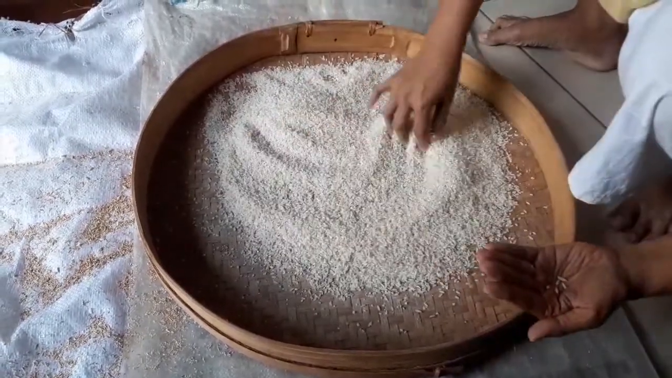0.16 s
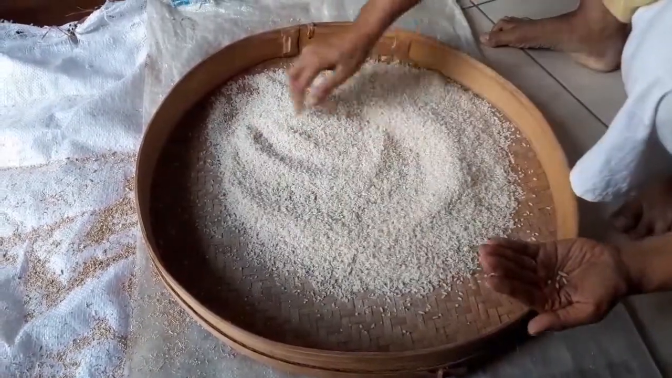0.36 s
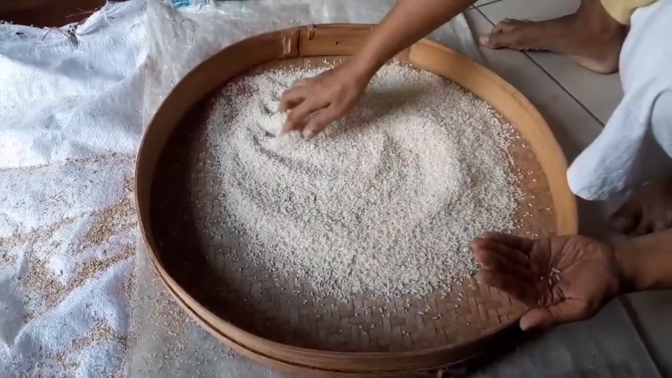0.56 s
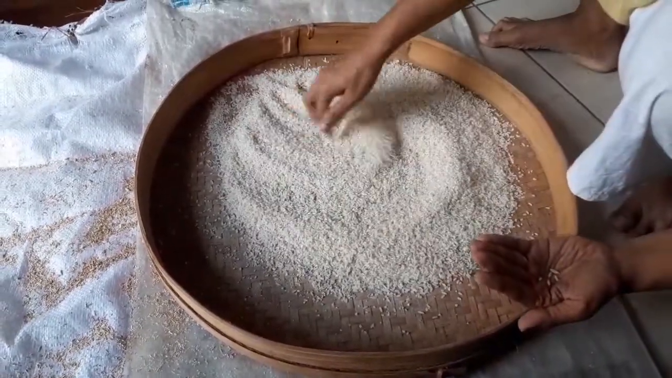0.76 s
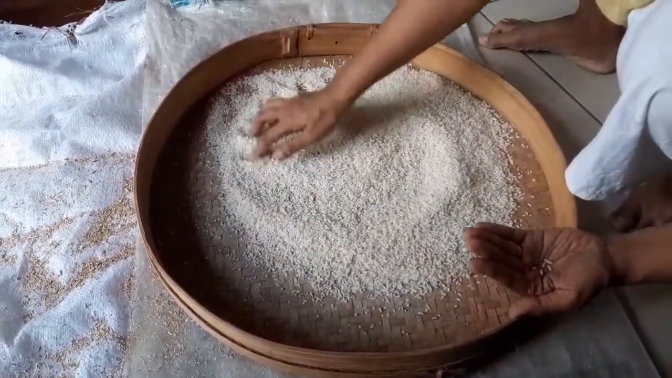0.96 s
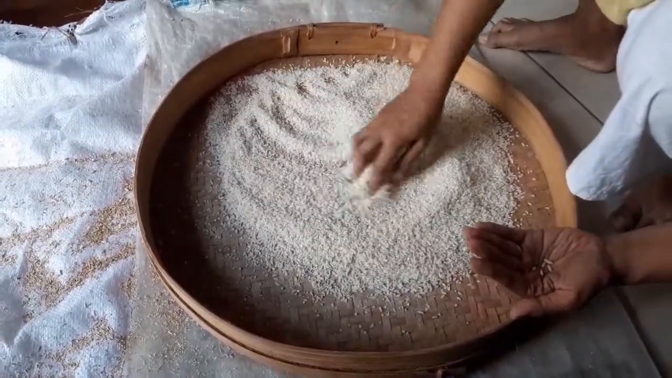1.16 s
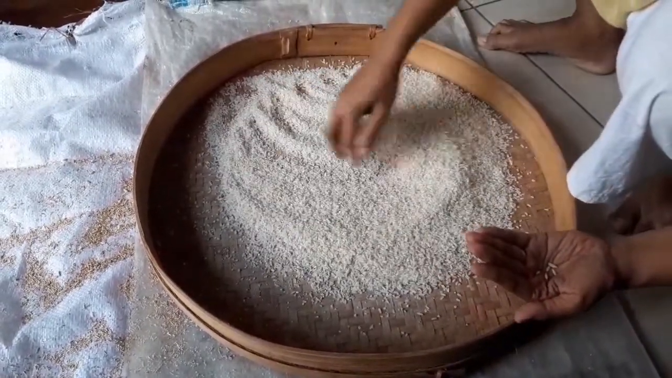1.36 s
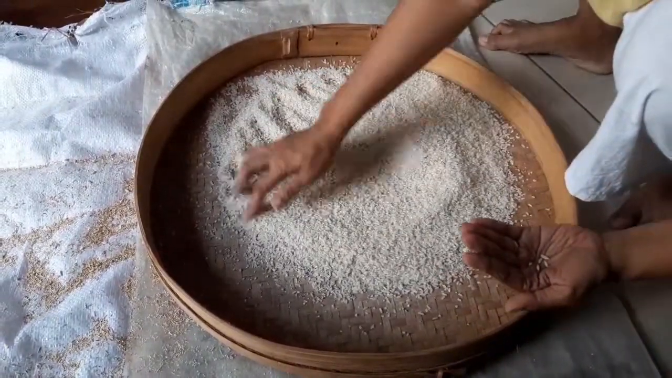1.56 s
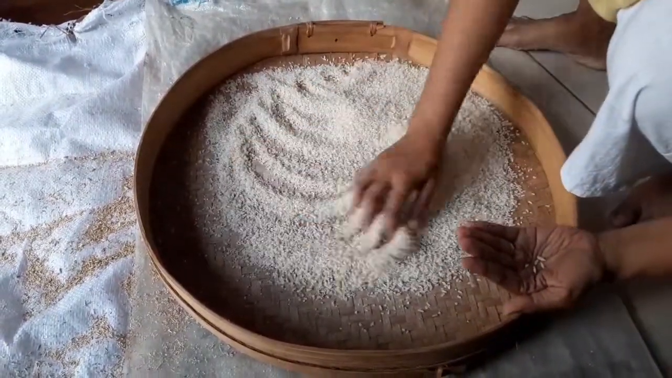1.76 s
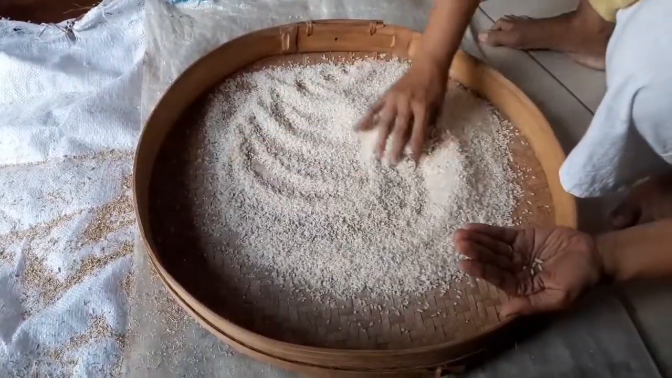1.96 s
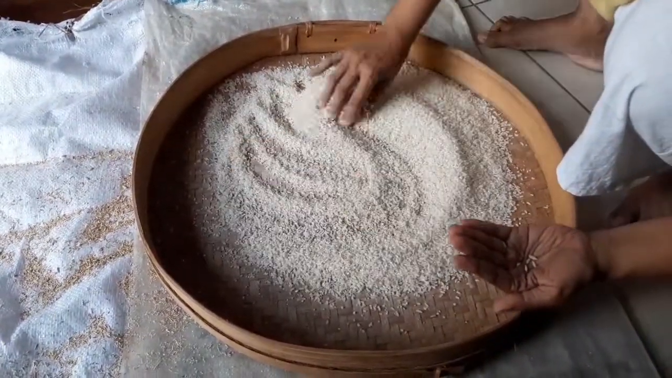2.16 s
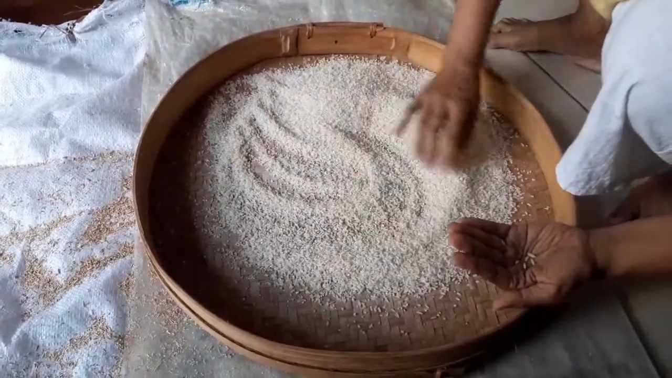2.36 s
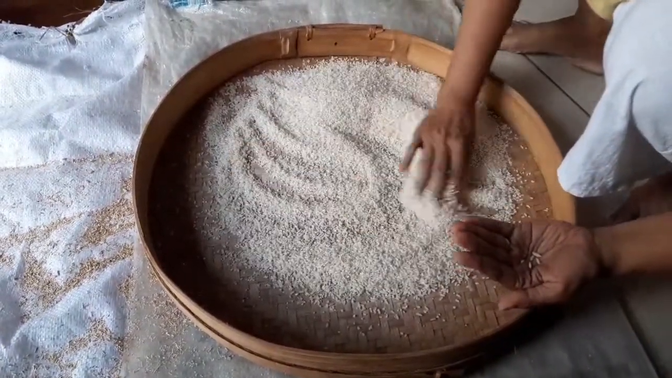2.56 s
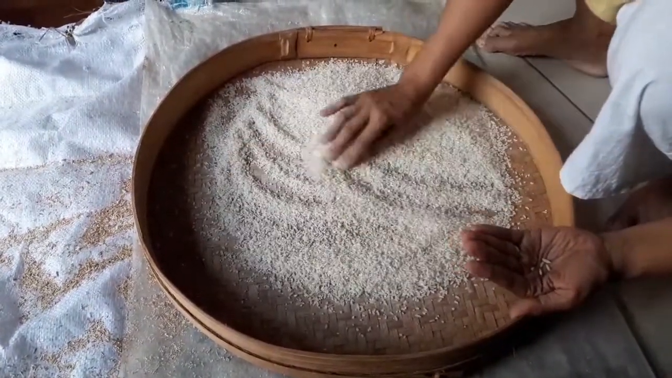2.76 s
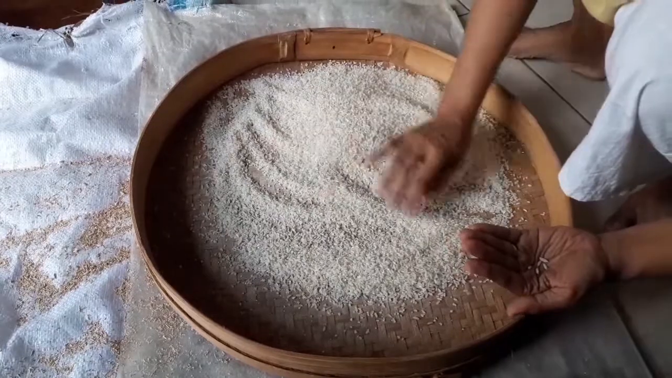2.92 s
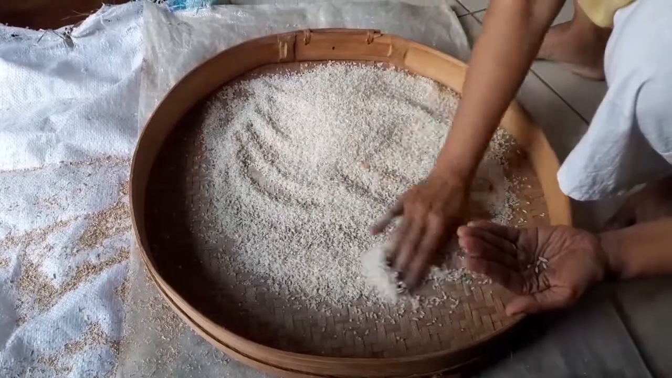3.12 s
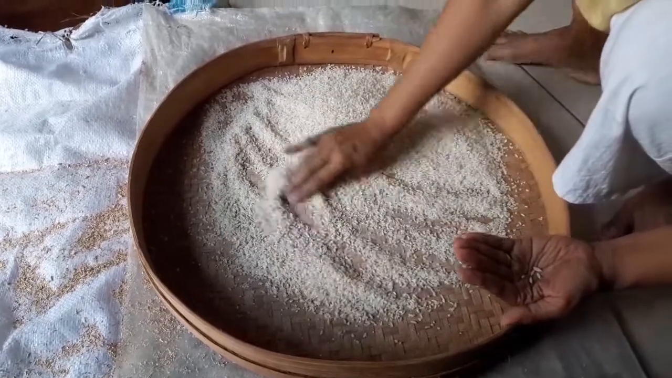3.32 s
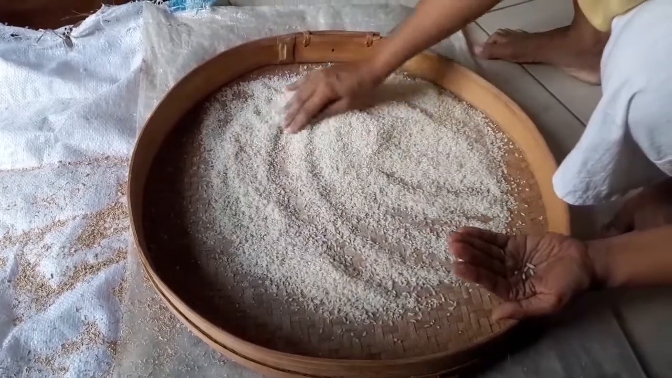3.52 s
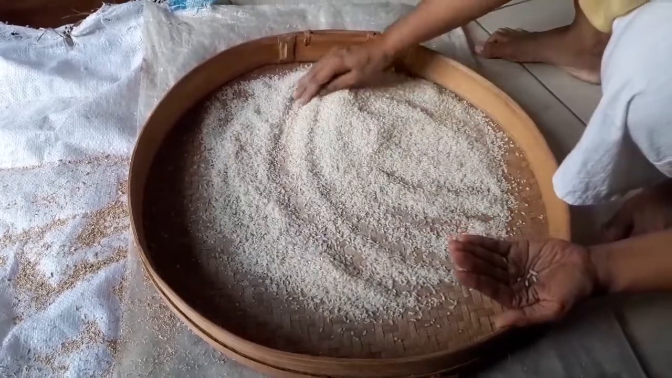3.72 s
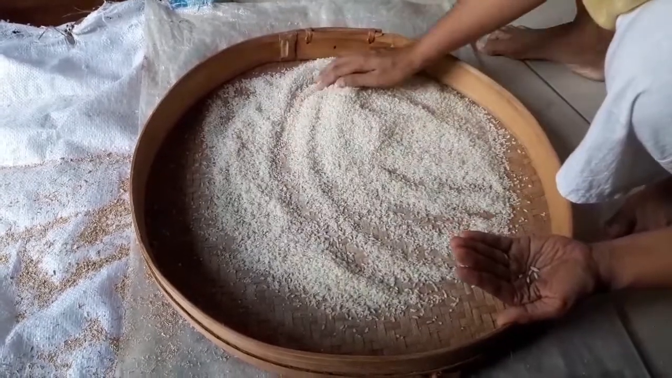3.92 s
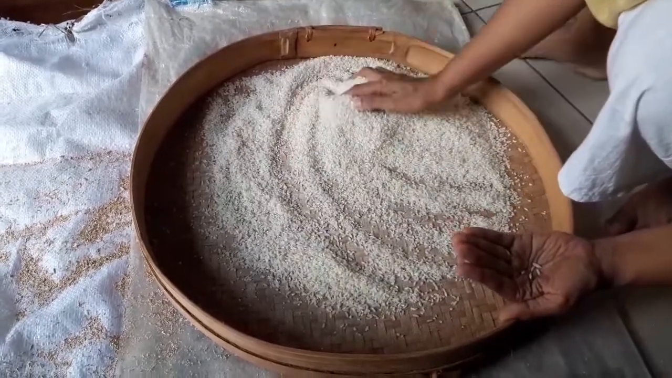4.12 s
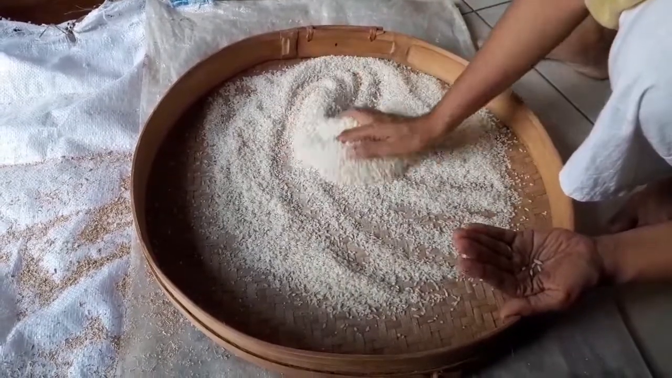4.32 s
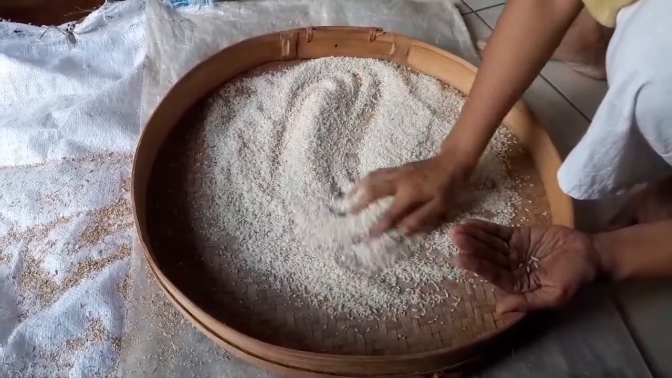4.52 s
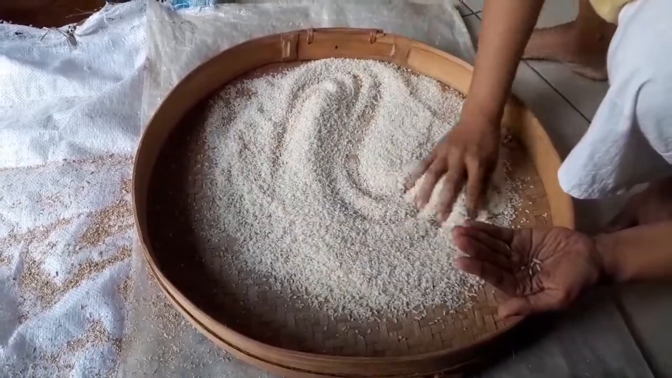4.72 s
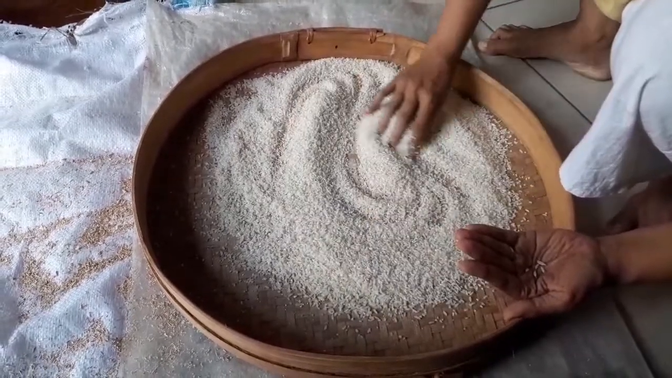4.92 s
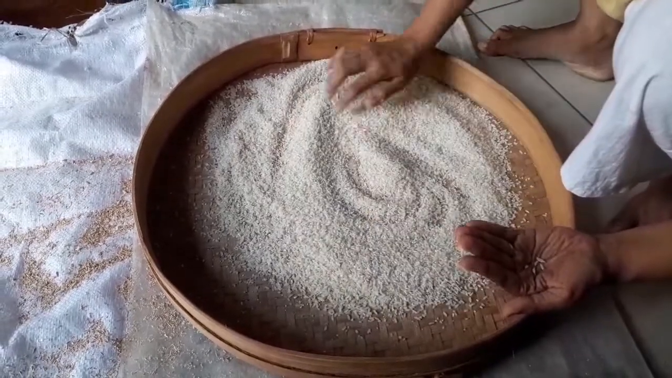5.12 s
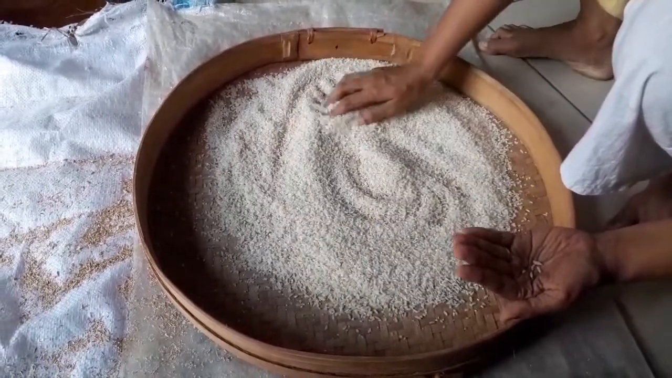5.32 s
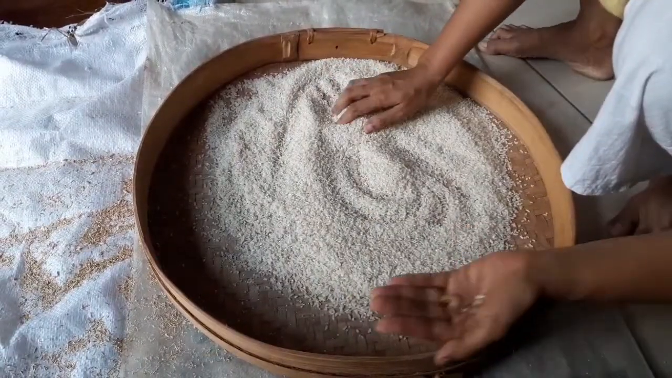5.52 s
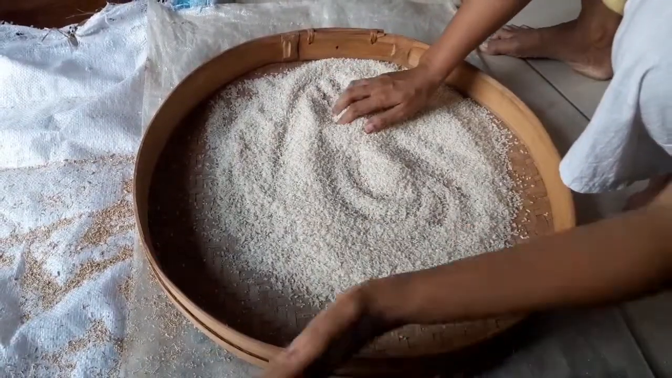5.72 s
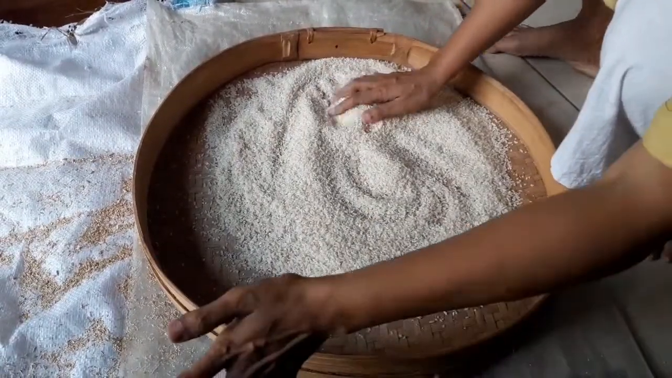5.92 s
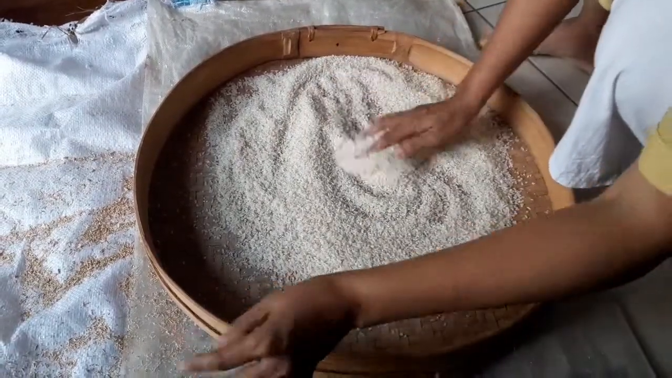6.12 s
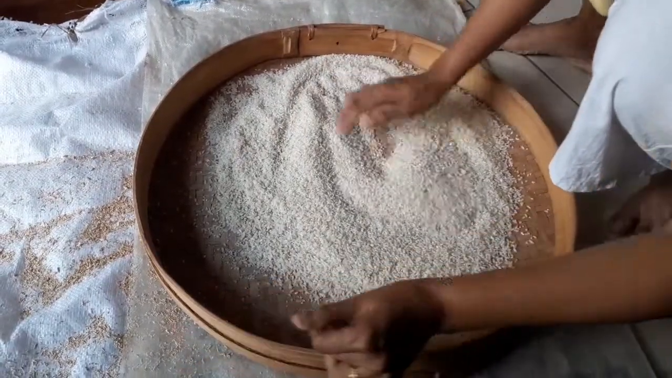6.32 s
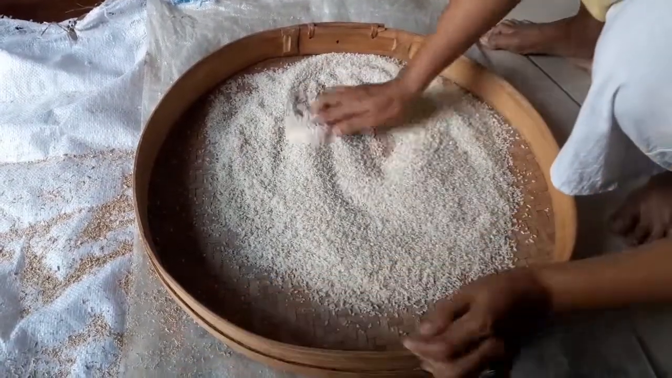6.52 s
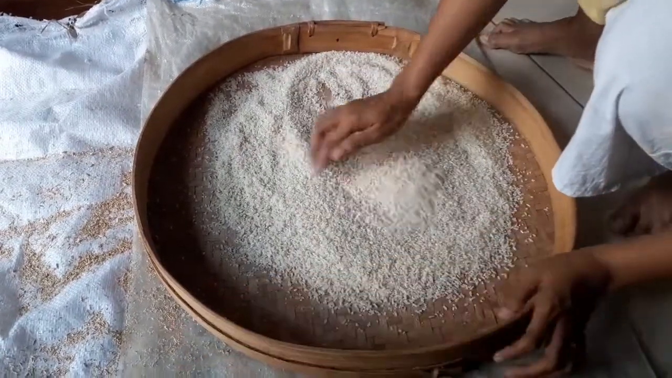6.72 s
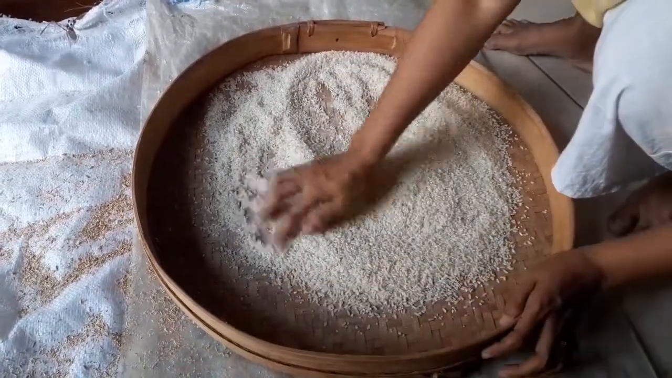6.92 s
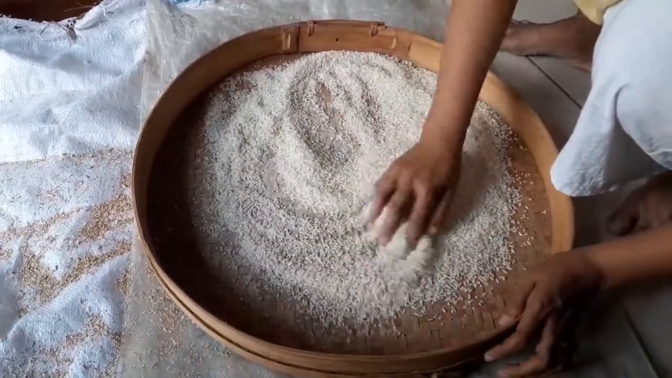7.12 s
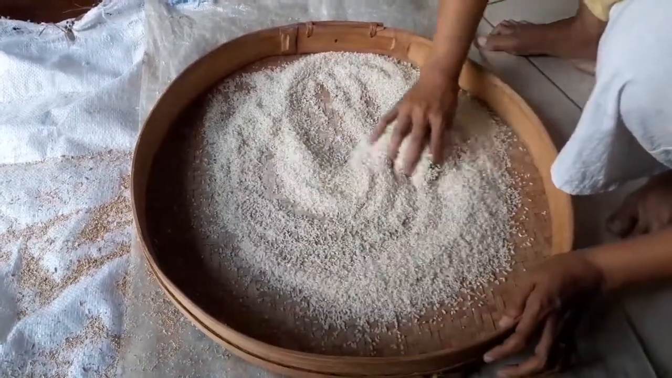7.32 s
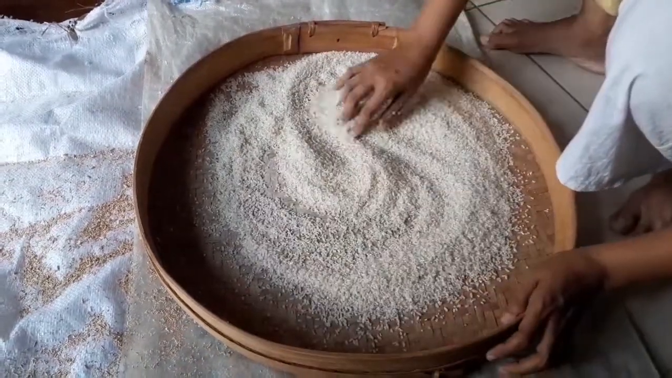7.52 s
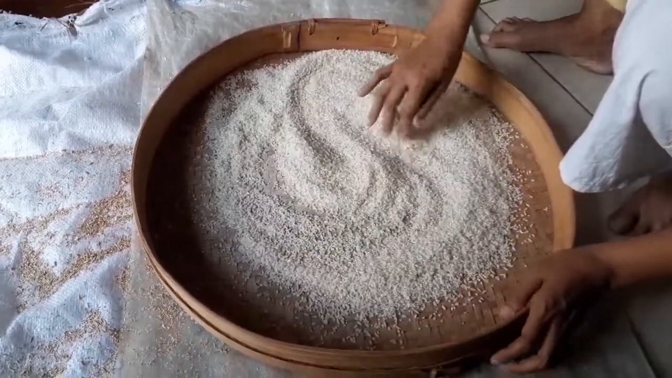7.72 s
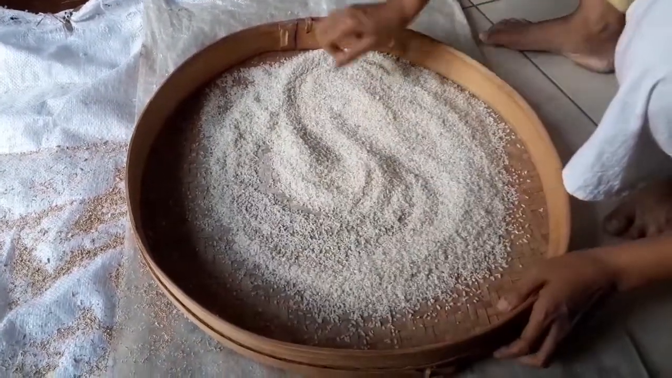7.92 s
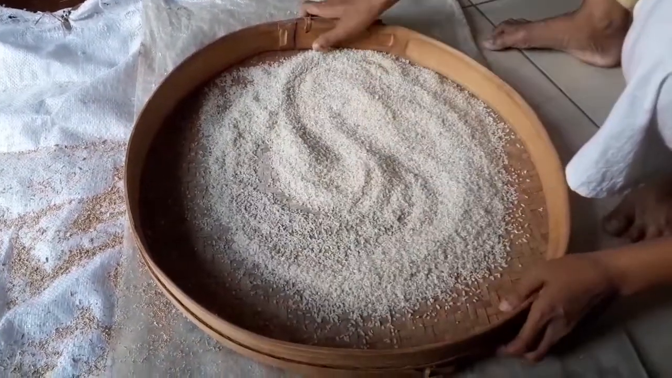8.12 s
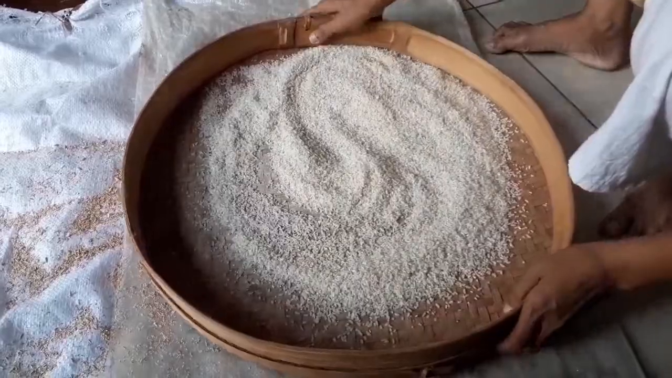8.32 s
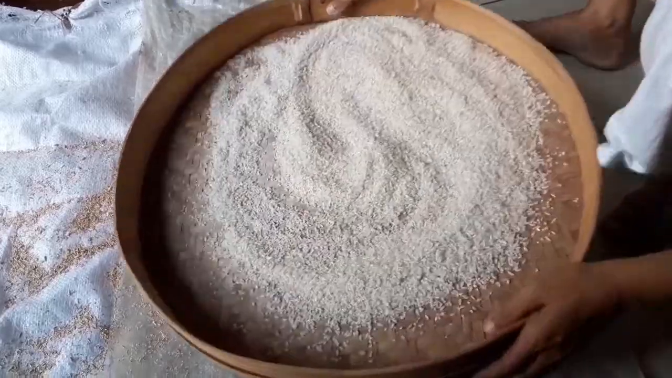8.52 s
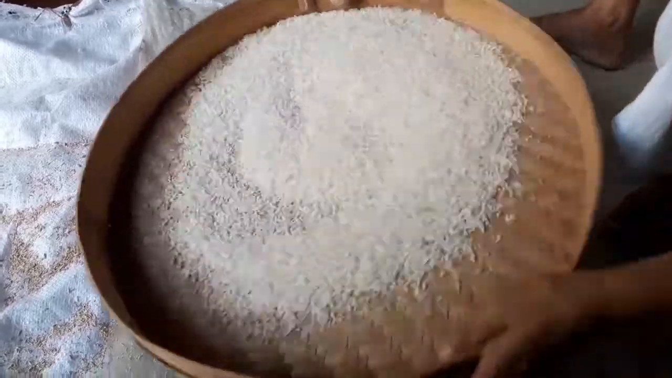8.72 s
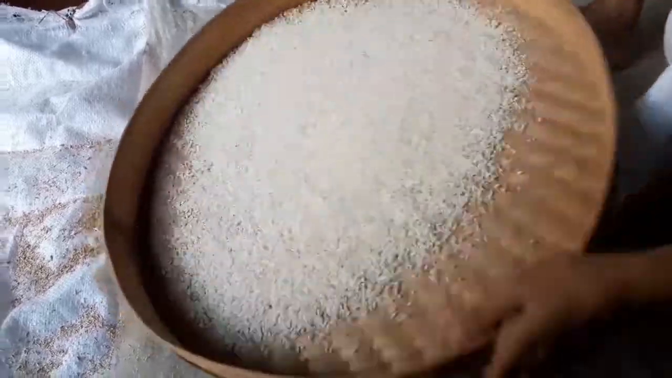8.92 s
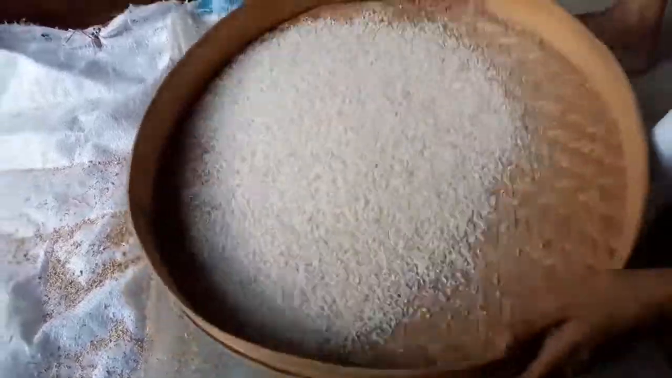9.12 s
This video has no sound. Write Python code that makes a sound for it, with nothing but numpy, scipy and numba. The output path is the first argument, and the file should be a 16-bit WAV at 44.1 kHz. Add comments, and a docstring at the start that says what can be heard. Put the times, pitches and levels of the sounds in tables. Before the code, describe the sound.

In a quiet tiled room, dry rice rustles close to the microphone as fingers sweep it across a woven tray, roughly twice a second. The strokes swell and fade unevenly, with soft taps and settling grains in the gaps. After a short lull, light knocks come as the tray is picked up, followed by four fast, louder shakes of the rice. A low motor hums faintly underneath.

```python
"""A fridge-like motor hums in a quiet tiled room. From the start a hand sweeps raw rice around a woven
tray on the floor: at each push thousands of grain collisions tick, the heap hisses lower and the weave
drums under the load. Between pushes fingertips tap and furrows cave in. At 8.3 s the tray is lifted,
which frees its low modes, and then shaken four times. A phone with two microphones is close by."""
import sys
import numpy as np
from scipy import signal
from scipy.io import wavfile
from scipy.ndimage import map_coordinates
from numba import njit

SR = 44100
rng = np.random.default_rng(int(sys.argv[2]) if len(sys.argv) > 2 else 0)


def write(x):
    x = np.atleast_2d(x).T
    wavfile.write(sys.argv[1], SR, np.round(np.clip(x, -1, 1) * 32767).astype(np.int16))

N = 408807


def undb(db):
    """Amplitude ratio of a level in decibels."""
    return 10 ** (np.asarray(db) / 20)

def at_level(x, db):
    """Normalisation to an rms level."""
    return x * undb(db) / np.sqrt(np.mean(x ** 2))

def waver(rate):
    """Slow random modulation: a spline on values 1 / rate s apart, with a spread near 1."""
    knots = rng.standard_normal(int(N / SR * rate) + 3)
    return map_coordinates(knots, [np.arange(0, N + 64, 64) * rate / SR], order=2).repeat(64)[:N]

def resonate(x, hz, *widths_hz):
    """Resonance: one second-order stage per bandwidth, in series, with unit gain at the centre."""
    for width in widths_hz:
        x = signal.lfilter(*signal.iirpeak(min(hz, .45 * SR), hz / width, fs=SR), x)
    return x

@njit
def glide(x, hz, q):
    """Time-varying resonance: a state-variable band-pass with unit gain at its moving centre."""
    y, band, low, damping = np.empty(len(x)), 0., 0., 1 / q
    for i in range(len(x)):
        g = np.tan(np.pi * hz[i] / SR)
        v = (band + g * (x[i] - low)) / (1 + g * (g + damping))
        band, low, y[i] = 2 * v - band, low + 2 * g * v, damping * v
    return y

def level_at(spectrum, hz):
    """Interpolation of a spectrum on a logarithmic frequency axis."""
    f, db = np.transpose(spectrum)
    return np.interp(np.log(hz), np.log(f), db)

def collisions(rate, scatter_db, lag_samples):
    """Shot noise: impacts of random size, each reaching the two microphones with its own lag."""
    chance, size, place = rng.random((3, N), dtype=np.float32)
    at = np.flatnonzero(chance < rate / SR)
    strength = undb(-scatter_db * np.log(1 - size[at]))
    blow = np.where(at % 2, 1, -1) * strength / np.sqrt(rate[at])  # equal power at any rate
    lag = np.rint(lag_samples * (place[at] - place[at - 1]) / 2).astype(int)  # most land mid-tray
    return np.array([np.bincount(np.clip(at + side * lag, 0, N - 1), blow, N) for side in (1, -1)])


COHERENT_HZ = 850  # well below this both microphones hear nearly the same
# Spectrum of the room tone: f/Hz, relative spectral level/dB
AIR_SPECTRUM = [(45, 0.5), (65, -5), (120, -7.5), (200, -9.5), (310, -6), (410, -20), (520, -7),
                (620, -15.5), (800, -12.5), (950, -48), (1500, -22), (3000, -26), (8000, -34), (15000, -36)]
def room_tone():
    """Diffuse noise in flickering third-octave bands, coherent between microphones only in the bass."""
    out, bass_swell_db = 0, 1.5 * waver(2.94)
    for hz in 50 * 2 ** np.arange(0, 8.4, 1 / 3):
        mid, side = resonate(rng.standard_normal((2, N), dtype=np.float32), hz, hz / 3, hz / 2)
        apart = np.clip(hz / COHERENT_HZ, 0, 1) ** 0.53
        db = level_at(AIR_SPECTRUM, hz) + 1.1 * waver(2.8) + (hz < 260) * bass_swell_db
        out = out + undb(db) * (mid + apart * side * np.array([[1], [-1]])) / np.sqrt(1 + apart ** 2)
    return at_level(out, -60) * undb([[-3], [3]])  # sits to the right


# Motor partials: multiple of the shaft rate, relative level/dB
HARMONICS = [(1, -0.5), (2, -6.5), (3, -11), (4, -14), (5, -15.5), (6, -17), (7, -13), (10, -9.5),
             (11, -4.5), (12, -18), (14, -8), (17, -15)]
# Swelling and sinking of the hum: t/s, level/dB
HUM_ENVELOPE = [(0.0, -61.5), (1.88, -61.5), (2.5, -59.5), (4.98, -61), (5.29, -63.5), (7.59, -59),
                (7.98, -66), (8.62, -58), (9.27, -62.5)]
# Coming and going of a second low tone: t/s, level/dB
NEIGHBOUR_ENVELOPE = [(0, -56), (1, -97), (2, -68), (2.5, -89.5), (4.9, -65.5), (5.3, -104), (9.27, -74)]
def motor(shaft_hz=48.4, neighbour_hz=52.3):
    """Rotation gives a harmonic series; a neighbouring tone beats against its fundamental."""
    t = np.arange(N) / SR
    angle = 2 * np.pi * np.cumsum(shaft_hz * (1 + 0.00091 * waver(0.71))) / SR
    hum = np.zeros((2, N))
    for k, db in HARMONICS:
        phase = 2 * np.pi * rng.random() + 0.056 * k * np.array([[1], [-1]])
        hum += undb(db + 0.5 * np.sqrt(k) * waver(3.7)) * np.sin(k * angle + phase)
    hum *= undb(np.interp(t, *np.transpose(HUM_ENVELOPE)))
    neighbour_gain = undb(np.interp(t, *np.transpose(NEIGHBOUR_ENVELOPE)))
    return np.sqrt(2) * (hum + neighbour_gain * np.sin(2 * np.pi * neighbour_hz * t))


def reverberation(x, t60_s=0.32, patterns=3, crossfade_s=.12):
    """Diffuse reflection off tiles and walls; as the hand moves, one echo pattern fades into the next."""
    t, out = np.arange(SR // 4) / SR, 0
    place = np.arange(N) / SR / crossfade_s % patterns
    for k in range(patterns):
        mid, side = rng.standard_normal((2, len(t))) * np.exp(-np.log(1000) * t / t60_s) * (t > .002)
        side = signal.lfilter(*signal.butter(1, COHERENT_HZ, "high", fs=SR), side)
        tail = np.array([mid + side, mid - side])
        away = np.minimum(np.abs(place - k), patterns - np.abs(place - k))
        share = np.cos(np.pi / 2 * np.minimum(away, 1))
        out = out + signal.oaconvolve(x * share, tail / np.sqrt(np.sum(tail ** 2) / 2), axes=1)[:, :N]
    return undb(-4.5) * out


def drag(tick_db, hz=146):
    """Sliding friction of the loaded tray: a low rumble that grows with the level of the rice."""
    rumble = resonate(rng.standard_normal(N), hz, hz, 2 * hz)
    return undb(0.43 * (tick_db + 33)) * at_level(rumble, -61.5)


# Modes of the woven tray: f/Hz, bandwidth/Hz, relative level/dB
TRAY_MODES = [(244, 27, -19), (296, 27, -5.5), (330, 40, 1), (420, 140, -13), (578, 165, -2.5),
              (714, 180, 0), (838, 205, 0.5), (993, 252, -1.5), (1142, 260, -5), (1336, 240, -10)]
def weave(rate, lift_s=8.33, damping_db_per_octave=7):
    """Modal vibration under grain impacts; the floor damps the low modes until the tray is lifted."""
    load = collisions(rate / 4, scatter_db=1.2, lag_samples=11)
    resting, out = np.arange(N) < lift_s * SR, 0
    for hz, width, db in TRAY_MODES:
        floor_db = resting * damping_db_per_octave * np.log2(hz / 1200)
        out = out + undb(db + 1.2 * waver(10) + floor_db) * resonate(load, hz, width, 2 * width)
    return at_level(out, -0.94)


# Fingertips landing, grains dropping, the rim creaking: t/s, level/dB, f/Hz, knock re crackle/dB, T60/s
TAP_EVENTS = [(0.5, -45, 5000, -18, .025), (0.96, -52, 5000, -22, .025), (1.560, -43, 4000, -25, 0.023),
              (3.072, -45, 2970, -20, 0.033), (5.250, -40, 3650, -28, 0.06), (5.644, -43, 8000, -12, 0.021),
              (5.952, -35.5, 960, -10, 0.038), (6.878, -58, 4000, -21, 0.02),
              (8.336, -35.5, 6500, 6, 0.024), (8.349, -38, 5000, -5, 0.013), (8.414, -37, 7000, -15, .014),
              (8.445, -35, 5500, -5, 0.012)]
def taps():
    """Impulsive excitation: a decaying crackle of band noise plus a knock into the tray modes."""
    out, t = np.zeros((2, N)), np.arange(SR // 8) / SR
    knock = sum(undb(db) * resonate(np.exp(-t / 0.0012), hz, 0.55 * width) for hz, width, db in TRAY_MODES)
    knock /= np.abs(knock).max()
    for start, db, hz, knock_db, t60 in TAP_EVENTS:
        noise = resonate(rng.standard_normal((2, len(t))), hz, 1.3 * hz, 2.7 * hz)
        crackle = at_level(noise, 0) * np.exp(-np.log(1000) * t / t60)
        i = int(start * SR)
        out[:, i:i + len(t)] += undb(db) * (crackle + undb(knock_db) * knock)
    return out


def hollow(rate, hz):
    """Cavity resonance: the cupped hand and the furrow form a hollow whose pitch moves."""
    impacts = collisions(rate / 4, scatter_db=2.0, lag_samples=8)
    return np.array([glide(glide(channel, hz, q=4.5), hz, q=3.0) for channel in impacts])


# Resonances of the heap within the rim: f/Hz, bandwidth/Hz, relative level/dB
HEAP_FORMANTS = [(1744, 444, -2), (2160, 94, -2), (2520, 750, -4)]
def heap(rate, hollow_hz):
    """Formant filtering: the rim and the hollow colour the hiss of the pushed heap."""
    shove = collisions(rate / 3, scatter_db=1.06, lag_samples=8)
    hiss = sum(undb(db + 1.2 * waver(14)) * resonate(shove, hz, width, 1.33 * width)
               for hz, width, db in HEAP_FORMANTS)
    return at_level(hiss + undb(-3) * hollow(rate, hollow_hz), -2.1)


# Spectrum of grain striking grain: f/Hz, relative spectral level/dB
TICK_SPECTRUM = [(3000, -1.5), (3600, 2), (4200, 0), (5200, -4), (6500, -5), (8000, 0), (10000, -7),
                 (12500, 0), (15000, -12)]
def ticks(rate):
    """Damped free vibration: grains of each size ring briefly at their own pitch."""
    out = 0
    for hz in 3000 * 2 ** np.arange(0, 2.4, 1 / 3):
        gain = undb(level_at(TICK_SPECTRUM, hz) + 1.2 * waver(30))
        impacts = collisions(rate / 3, scatter_db=1.7, lag_samples=6)
        out = out + gain * resonate(impacts, hz, hz / 3, hz / 1.15)
    return at_level(out, 0.98)


# Pushes by the fingers, one for each turn of the hand:
# t/s, rise/s, 20 dB fall/s, tick level/dB, heap re ticks/dB, weave re ticks/dB, hollow f/Hz
HAND_STROKES = [ (-.06, 0.055, 0.28, -32.5, -1.5, -12, 1540), (0.495, .165, 0.1257, -37.5, -3.5, -14, 2330),
                (0.954, 0.18, 0.19, -32, -4, -10, 2190), (1.554, .19, 0.38, -31.5, -1.5, -8, 1860),
                (1.93, 0.15, 0.15, -38.5, -6.5, -15.5, 2200), (2.182, 0.058, .146, -43.5, -1, -9, 2170),
                (2.508, .152, .125, -33.5, -3, -12.5, 2130), (3.071, 0.16, 0.2958, -30, -2, -10, 1970),
                (3.661, 0.096, 0.1, -50.5, 2.5, -8, 2505), (3.846, .165, 0.41, -43, -2, -12, 2550),
                (4.189, 0.27, 0.1855, -34, -3.5, -12, 2670), (4.44, 0.16, 0.47, -32.5, 0, -10, 1900),
                (4.758, 0.14, 0.21, -35.5, -7.5, -18.5, 2280), (5.248, 0.15, 0.0051, -42.5, -2, -15, 2220),
                (5.881, 0.084, 0.04, -46.5, -3.5, -15, 2100), (6.015, 0.18, 0.07, -33.5, -6.5, -17, 2270),
                (6.25, 0.017, 0.13, -46, 2, -8.5, 1810), (6.482, .13, 0.15, -33, -5, -16, 2300),
                (6.871, .12, 0.29, -31.5, -3, -9.5, 1920), (7.0, .14, 0.2536, -33, 0, -12, 2040),
                (7.274, .14, .223, -34.5, -3.5, -15.5, 2330),
                (7.588, 0.059, 0.1051, -41.5, -3.5, -9.5, 2120)]
# Furrows caving in by themselves: same columns
FURROW_SLIPS = [ (.26, 0.056, 0.075, -48.5, -5, -15, 2390), (.808, 0.037, .034, -54.5, -3.5, -18, 2300),
                (1.42, 0.02, 0.024, -56.5, -10.5, -22.5, 2150), (1.48, .03, .03, -61, -10, -17, 2300),
                (2.794, 0.011, 0.13, -52, 3.5, -6.5, 2150), (5.09, 0.024, 0.063, -52, 1, -15.5, 2040),
                (7.85, 0.034, 0.05, -69, 0, -10, 2300), (6.835, .012, 0.015, -54, -9, -27, 2150),
                (8.048, 0.019, .02, -63, -8, -15, 2040), (8.12, 0.032, 0.055, -69, 3, 5, 1850),
                (8.19, 0.047, 0.044, -61.5, -12, -9, 2150)]
# Lifting, tilting and four shakes: same columns
LIFT_AND_SHAKES = [ (8.333, 0.014, 0.21, -54.5, -0.5, -3.5, 1970), (8.481, .018, 0.68, -54.5, -2, -7, 2100),
                   (8.576, 0.027, 0.15, -45.5, -2, -1.5, 1950), (8.669, .075, 0.085, -24.5, -4, -6, 1980),
                   (8.777, .078, .051, -24.5, -3.5, -4, 2140), (8.878, 0.079, 0.076, -23, -3.5, -5.5, 2030),
                   (8.991, 0.055, .17, -29.5, -4.5, -3.5, 2000)]
def pushes(onset=0.11, sink_in_s=0.0022, settle_s=0.079, settle_db=-20, climb_per_s=0.36):
    """Incoherent sources add in power: all pushes give three level curves and the hollow's pitch."""
    events = np.array(HAND_STROKES + FURROW_SLIPS + LIFT_AND_SHAKES)
    start, rise, fall, db, heap_db, weave_db, hz = events.T[:, :, None]
    t = np.arange(N * 1000 // SR + 2) / 1000
    since = t - start
    arc = np.sin(np.pi / 2 * np.clip(since / rise, 0, 1)) ** 1.15
    swell = (onset + (1 - onset) * arc) * np.clip(since / sink_in_s, 0, 1)
    fade = undb(-20 * (np.maximum(since - rise, 0) / fall) ** 2.43)
    push = swell * fade
    decay = np.exp(-t[1] / settle_s)
    bursts = undb(2 * 4.5 * np.interp(t * SR, np.arange(N), waver(40)))

    def power(gain):
        """Exponential relaxation: grains roll on after each push, in uneven bursts."""
        moving = np.sum(gain ** 2, axis=0)
        rolling = signal.lfilter([1 - decay], [1, -decay], moving)
        return moving + undb(2 * settle_db) * bursts * rolling + 1e-10

    tick_power = power(push * undb(db))
    # exponents above 1: heap and weave are fullest at the peak of a push
    heap_power = power(swell ** 1.14 * fade ** 1.09 * undb(db + heap_db))
    weave_power = power(swell ** 1.16 * fade ** 1.53 * undb(db + weave_db))
    # the hollow lies higher in a weak push, climbs along it and wanders as the fingers shift
    bend = 1 + 0.095 * (1 - push) + climb_per_s * (since - rise)
    hollow_hz = np.sqrt(power(push * undb(db) * hz * bend) / tick_power)
    hollow_hz *= 1 + 0.066 * np.interp(t * SR, np.arange(N), waver(12))
    levels = 10 * np.log10([tick_power, heap_power / tick_power, weave_power / tick_power])
    return [np.interp(np.arange(N) / SR, t, curve) for curve in (*levels, np.clip(hollow_hz, 1200, 3500))]


def rice(tick_db, heap_db, weave_db, hollow_hz):
    """Granular flow: the collision rate rises with level, from lone ticks to a dense swish."""
    rate = np.clip(4000 * undb(.6 * (tick_db + 49.5)), 250, 24000)
    gain = undb(tick_db + 0.55 * waver(25))
    return gain * (ticks(rate) + undb(heap_db) * heap(rate, hollow_hz) + undb(weave_db) * weave(rate))


def scene():
    """Superposition of rice, taps, their reverberation, the motor, the room tone and the drag."""
    tick_db, heap_db, weave_db, hollow_hz = pushes()
    direct = rice(tick_db, heap_db, weave_db, hollow_hz) + taps()
    return direct + reverberation(direct) + motor() + room_tone() + drag(tick_db)


def record(dry, bass_hz=42, top_hz=15750):
    """Band limiting: the phone cuts the deepest bass and the top."""
    dry = dry * undb([[-1.01], [1.01]])  # the right microphone is more sensitive
    dry = signal.sosfilt(signal.butter(6, bass_hz, "high", fs=SR, output="sos"), dry)
    return signal.sosfilt(signal.ellip(10, .2, 80, top_hz, fs=SR, output="sos"), dry)


dry = scene()
out = record(dry)
write(out)
```